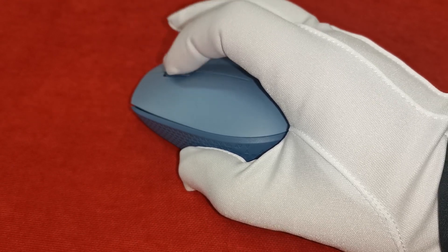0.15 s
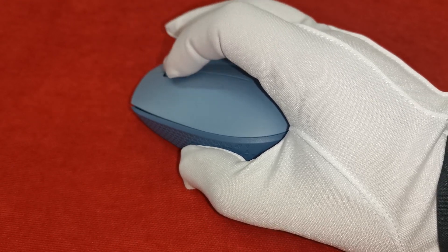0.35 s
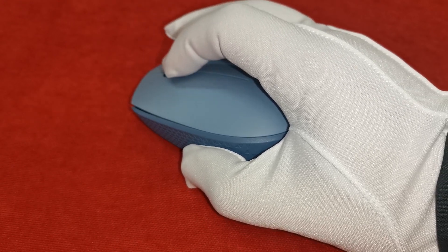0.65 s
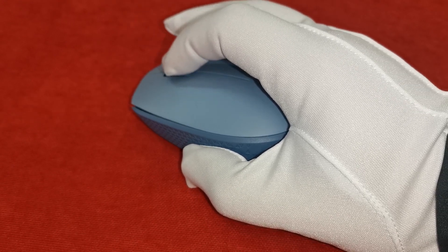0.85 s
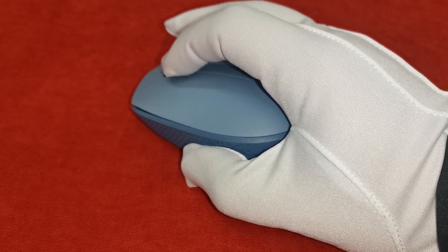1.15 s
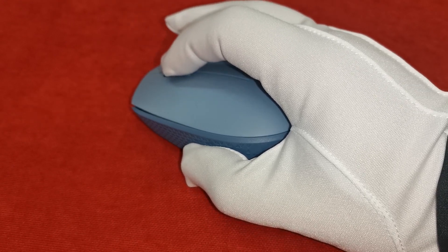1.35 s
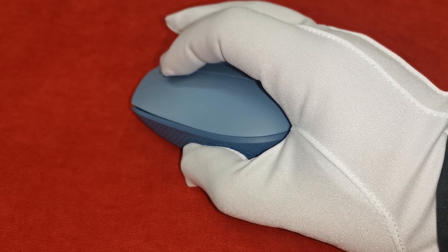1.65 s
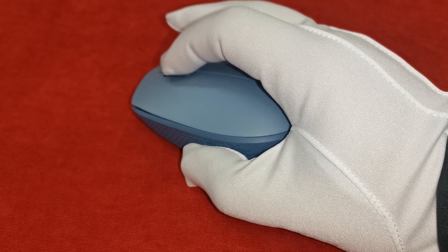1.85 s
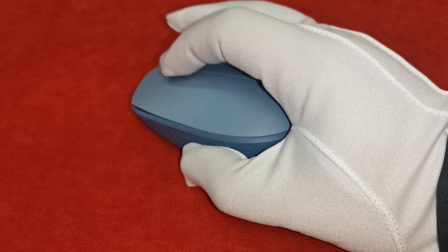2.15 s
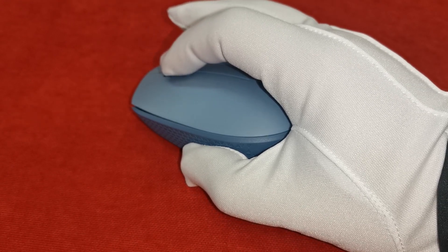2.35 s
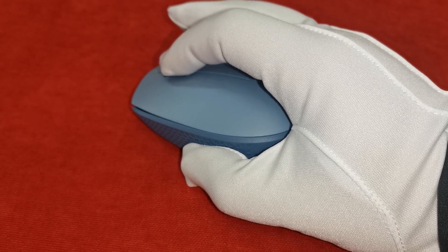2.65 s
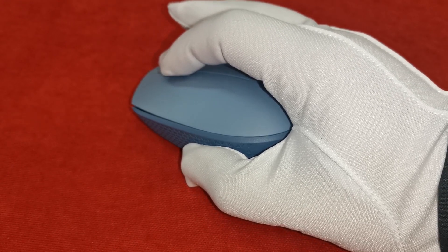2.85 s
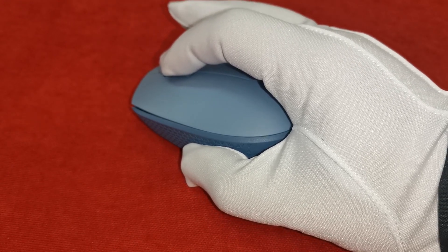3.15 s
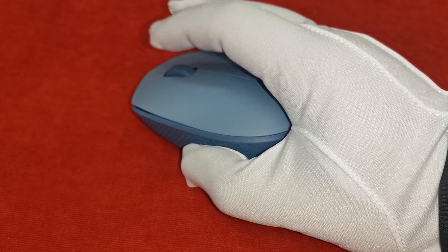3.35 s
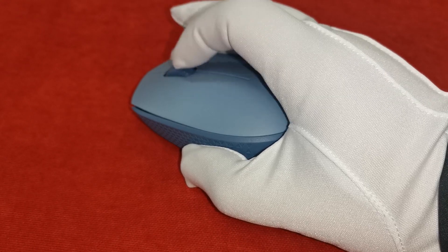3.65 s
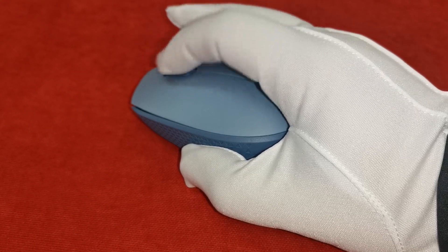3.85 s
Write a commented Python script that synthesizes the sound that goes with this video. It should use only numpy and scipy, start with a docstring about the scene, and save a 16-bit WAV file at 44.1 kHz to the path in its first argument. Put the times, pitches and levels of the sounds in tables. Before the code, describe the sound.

Computer mouse button clicks sixteen times, sharp presses and softer releases, close in a quiet room

```python
"""A quiet room, where a gloved finger clicks a computer mouse button sixteen times close to a stereo
microphone. Each press snaps the switch and rings the plastic shell brightly; each release is a softer, hollower
knock. Both are sums of damped shell modes. At the end the scroll wheel starts to roll, as a train of quick
ticks. Faint rustles sound in narrow noise bands, the room adds echoes and a decaying tail, and shaped noise
gives faint hiss, rumble and hum underneath."""
import sys
import numpy as np
from scipy import signal
from scipy.fft import rfft, irfft
from scipy.io import wavfile

SR = 44100
rng = np.random.default_rng(int(sys.argv[2]) if len(sys.argv) > 2 else 0)


def to_wav(s):
    """Save 16-bit WAV."""
    ch = np.atleast_2d(s).T  # columns
    pcm = np.round(np.clip(ch, -1, 1) * 32767)  # PCM
    wavfile.write(sys.argv[1], SR, pcm.astype(np.int16))


N = 176400  # samples, 4 s


# Presses of the button. Each row: start in seconds, relative level in dB, extra knock near 1 kHz in dB,
# extra clack near 1.6 kHz in dB, extra treble in dB.
PRESSES = [(0.4041, -2.4, 1.5, 1.5, -0.5), (0.835, -2.5, 0, 1.5, -4), (1.0455, 1, 0, -1.5, -4),
           (1.2248, 0.45, 0.5, 0.7, -3), (1.3929, -1.0, 1.3, 0.2, -3.5), (1.5542, -2.3, 4.5, 3, -1),
           (1.7313, -0.5, 3.3, -1.3, -4), (1.895, 0.7, 3.5, -1.5, -4.4), (2.0725, -0.8, 2.8, -1.3, -4.5),
           (2.2431, 0.5, 2.5, 0, -4.3), (2.4119, -1.2, 4.1, 0, -3), (2.5788, 0.4, 3.3, -2.5, -3.9),
           (2.7532, 1.3, 0.7, -2, -3), (2.9281, 0.9, 4.5, 2, -1.5), (3.0988, 0.7, 3.2, 0, -1.8),
           (3.2756, -3, 7, 5.5, 0.5)]
# Contacts within one press. Each row: delay in seconds, relative level in dB.
PRESS_CONTACTS = [(.0001, 1.5), (.00092, -7.5), (.0024, -24.5)]
PRESS_DB, PRESS_JITTER_S = 1.5, .000008


def button_presses():
    """Modal excitation: the snapping switch drives the shell's bright modes, nearly alike each time."""
    pressed_db = np.transpose(SHELL)[2]
    return button(PRESSES, PRESS_CONTACTS, pressed_db + PRESS_DB, PRESS_JITTER_S)


# Releases of the button. Each row: start in seconds, relative level in dB, extra knock near 1 kHz in dB,
# extra clack near 1.6 kHz in dB, extra treble in dB.
RELEASES = [(0.4788, -2.5, 0.4, -3, -1), (0.9595, 2.3, -16, -11, -5), (1.1387, 4, -5, -3.3, -6),
            (1.3004, 4.5, -12, -7, -6.5), (1.4745, -1.3, 0.6, 2, -0.5), (1.6621, -1.3, 0.2, -11, -4.5),
            (1.8128, -7, 5, 9, -0.5), (1.9915, 1.6, -1, -1, -2.3), (2.1579, 1, -3.1, -2.4, -6),
            (2.3248, -3.5, 3.5, 2, -0.5), (2.5102, 0, -0.3, -2.4, -3.5), (2.686, -1.2, -1, -3, -0.5),
            (2.8456, -1.5, 1.3, 0.9, -3.5), (3.0253, -0.5, 1.5, 3, -2), (3.1828, -2.5, 1.5, 0.5, 0.1),
            (3.3661, -3.6, 2.1, 8, 0.2)]
# Contacts within one release. Each row: delay in seconds, relative level in dB.
RELEASE_CONTACTS = [(.0002, 2), (.0021, -8.5)]
RELEASE_DB, RELEASE_JITTER_S = 2, .00007


def button_releases():
    """Modal excitation: the release favours the low modes, and its contacts are more loosely timed."""
    released_db = np.transpose(SHELL)[3]
    return button(RELEASES, RELEASE_CONTACTS, released_db + RELEASE_DB, RELEASE_JITTER_S)


def button(strokes, contacts, drive_db, jitter_s):
    """Repeated impact: each stroke snaps the switch over, and it strikes again a moment later."""
    out = np.zeros((3, N))
    for start_s, db, knock, clack, treble in strokes:
        for delay, contact_db in contacts:
            late_s = abs(delay + jitter_s * rng.standard_normal())
            colour_db = [knock, clack, 0, treble]
            add(out, start_s, ring(drive_db + db + contact_db, colour_db, late_s))
    return out


# Modes of the plastic shell. Each row: frequency in Hz, 60 dB decay time in seconds,
# relative level when pressed in dB, relative level when released in dB, left minus right in dB.
SHELL = [(629, 0.034, -51, -54.5, -0.5), (821.5, .022, -42, -38, 3), (1117, 0.012, -38.5, -34.5, -3),
         (1326, 0.011, -35, -50.5, -2.5), (1724, 0.01, -27.5, -45.5, 2.5), (2042, 0.03, -36.5, -52, 2),
         (2415, 0.014, -27, -42, 2.5), (2760, 0.0099, -24, -42, 1), (3158, 0.0085, -28.5, -42.5, -2),
         (3680, .012, -31.5, -50, -6), (4270, 0.013, -34.5, -52, -9.5), (5240, 0.0046, -39, -49.5, -9),
         (6600, 0.014, -48.5, -61, -15), (12430, 0.0065, -56, -65, -20)]
# Centres of the knock, clack, middle and treble colouring, in Hz.
COLOUR_HZ = [1100, 1500, 2500, 3600]
MODE_SCATTER_DB = 1.48
RIGHT_LAG_S = .000085  # the sound reaches the left port first


def ring(drive_db, colour_db, delay_s, size=2400):
    """Modal superposition: one contact sums damped sines, heard at the left port, right port and in the room."""
    hz, t60, _, _, side_db = np.transpose(SHELL)
    coloured_db = drive_db + np.interp(np.log(hz), np.log(COLOUR_HZ), colour_db)
    mode_db = coloured_db + MODE_SCATTER_DB * rng.standard_normal(len(hz))
    sign = (-1) ** np.arange(len(hz))  # neighbouring modes swing in opposite directions
    paths = []
    for lag_s, side in ((0, .5), (RIGHT_LAG_S, -.5), (0, 0)):
        t = np.maximum(np.arange(size) / SR - delay_s - lag_s, 0)[:, None]
        envelope = amp(mode_db + side * side_db - 60 * t / t60)
        modes = sign * envelope * np.sin(2 * np.pi * hz * t)
        paths.append(modes.sum(1))
    return np.array(paths)


WHEEL_START_S, WHEEL_TICKS_PER_S = 3.964, 330
WHEEL_DB, WHEEL_SCATTER_DB = -11, 1.5
# Colouring of the wheel's ticks: knock, clack, middle and treble, in dB.
WHEEL_COLOUR_DB = [4, 2, 2.5, 3.5]


def wheel():
    """Impact train: the rolling wheel rattles the shell's release modes with quick uneven ticks."""
    released_db = np.transpose(SHELL)[3]
    out = np.zeros((3, N))
    for start_s in np.arange(WHEEL_START_S, N / SR, 1 / WHEEL_TICKS_PER_S):
        db = WHEEL_DB + WHEEL_SCATTER_DB * rng.standard_normal()
        late_s = .5 * rng.random() / WHEEL_TICKS_PER_S  # up to half an interval
        add(out, start_s, ring(released_db + db, WHEEL_COLOUR_DB, late_s))
    return out


# Tone of the clicks as picked up by the microphone. Each row: frequency in Hz, gain in dB.
MICROPHONE_TONE = [(100, -17), (450, -2), (750, -2.5), (6800, -1.5), (7600, -4), (8800, -10.5), (9500, -1),
                   (14000, -6.5)]


def microphone_colour(x, size=2048):
    """Microphone colouring: the clicks are heard with thinned bass and a dip near 8.8 kHz."""
    log_gain = np.log(amp(read(MICROPHONE_TONE, abs(np.fft.fftfreq(size, 1 / SR)))))
    # The Hilbert transform of the log gain gives the phase of a causal, minimum-phase filter.
    response = np.exp(signal.hilbert(log_gain).conj())
    taps = np.fft.ifft(response).real
    return signal.oaconvolve(x, taps[None], axes=1)[:, :N]


# Faint rustles in narrow noise bands: one fades away as the scene opens, and later the glove brushes the shell.
# Each row: centre in seconds, spread in seconds, # frequency in Hz, width in Hz, level in dB.
RUSTLES = [(.005, 0.017, 3100, 200, -65.5), (.005, 0.021, 6300, 600, -74.5), (3.705, 0.031, 1150, 140, -70)]
RASP_HZ, RASP_WIDTH_HZ, RASP_DB = 6560, 350, -70.5


def glove():
    """Friction noise: a faint rustle fades as the scene opens, the glove brushes the shell once, and it rasps
    on the turning wheel."""
    t = np.arange(N) / SR
    rustles = np.zeros(N)
    for centre_s, spread_s, hz, width_hz, db in RUSTLES:
        swell = np.exp(-.5 * ((t - centre_s) / spread_s) ** 2)
        rustles += amp(db) * swell * band_noise(hz, width_hz)
    rasp = amp(RASP_DB) * (t > WHEEL_START_S) * band_noise(RASP_HZ, RASP_WIDTH_HZ)
    return rustles + rasp


# Diffuse tail of the room. Each row: frequency in Hz, 60 dB decay time in seconds, tail level in dB.
ROOM = [(300, .5, 3.5), (624, 0.41, 0), (1000, 0.22, -8.5), (1730, 0.25, -6), (2240, 0.33, -8.5),
        (2760, 0.43, -13), (3900, 0.25, -8), (7000, 0.2, -11.5), (13000, 0.094, -8)]
ROOM_DELAY_S = .003
# Standing waves of the room. Each row: frequency in Hz, 60 dB decay time in seconds, level in dB.
ROOM_MODES = [(486.8, 1, -54.5), (606, 0.29, -50.5), (866, 0.29, -70.5)]
# Echoes from nearby surfaces. Each row: delay in seconds, left level in dB, right level in dB.
ECHOES = [(.0033, -23, -25), (0.0086, -44, -13.5)]


def room(x, size=24000):
    """Reverberation: close echoes, standing waves and a diffuse tail whose decay depends on frequency."""
    hz, t, z = signal.stft(rng.standard_normal((2, size)), SR, nperseg=256)
    z = z / (abs(z) + 1e-12) * z.std()  # an even, uncoloured wash
    rate = np.log(1000) / read(ROOM, hz)[:, None]
    decay = np.exp(-rate * t)
    equal_energy = np.sqrt(2 * rate / SR)  # offsets the decay time's effect on energy
    z = z * decay * equal_energy * amp(read(ROOM, hz, axis=2))[:, None]
    tail = signal.istft(z, SR, nperseg=256)[1]
    age = np.arange(tail.shape[1]) / SR
    for mode_hz, t60, db in ROOM_MODES:
        tail = tail + amp(db - 60 * age / t60) * np.sin(2 * np.pi * mode_hz * age)
    out = np.zeros((2, N))
    add(out, ROOM_DELAY_S, signal.fftconvolve(x, tail, axes=1))
    for delay, left_db, right_db in ECHOES:
        add(out, delay, x * amp([[left_db], [right_db]]))
    return out


# Spectrum of the hiss. Each row: frequency in Hz, relative density in dB per Hz.
HISS = [(300, -8), (600, -2), (900, 0), (1400, -5.5), (3000, -9), (4800, -12), (6800, -20), (7700, -26),
        (8800, -29), (10500, -23.5), (12600, -21), (14400, -50)]
HISS_DB = -69
# Spectrum of the low room noise. Each row: frequency in Hz, relative density in dB per Hz.
RUMBLE = [(12, -31), (20, 3.5), (27, -8), (70, -6), (114, -7.5), (192, -4.5), (282, -9), (340, -12),
          (370, -11), (600, -24.5), (780, -30), (1320, -120)]
# Level of the low room noise. Each row: time in seconds, level in dB.
RUMBLE_DB = [(0.0, -64.5), (.2, -63), (.4, -63.5), (.75, -63), (1.5, -65), (3.2, -64), (3.9, -66)]
# Bands of the hum. Each row: frequency in Hz, width in Hz, level in dB.
HUM = [(44.5, 8.3, -83.5), (157, 7.6, -75.5), (206.5, 13, -75.5)]


def background():
    """Stationary and modulated noise: steady hiss, a slowly swelling rumble and a low, wavering hum."""
    rumble_db = np.interp(np.arange(N) / SR, *np.transpose(RUMBLE_DB))
    rumble = amp(rumble_db) * stereo_noise(RUMBLE)
    hum = sum(amp(db) * band_noise(hz, width_hz / 2) for hz, width_hz, db in HUM)
    hiss = amp(HISS_DB) * stereo_noise(HISS)
    return hiss + rumble + hum


# Likeness of the noise at the two ports. Each row: frequency in Hz, correlation from 0 to 1.
NOISE_LIKENESS = [(30, .45), (150, 0.38), (400, 0.45), (1000, 0.12), (3000, 0.045), (12000, 0.015)]
# Balance of the noise. Each row: frequency in Hz, left minus right in dB.
NOISE_BALANCE = [(40, 0), (180, -3.5), (1000, -2), (4000, -2), (12000, -6.5)]


def stereo_noise(spectrum):
    """Spatial coherence: noise of rms 1, partly alike at both ports in the bass, barely in the treble."""
    hz = np.fft.rfftfreq(N, 1 / SR)
    a, b = rfft(rng.standard_normal((2, N)))
    same = np.clip(read(NOISE_LIKENESS, hz), -1, 1)
    z = np.array([a, same * a + np.sqrt(1 - same ** 2) * b])
    side_db = np.array([[.5], [-.5]]) * read(NOISE_BALANCE, hz)
    return unit(irfft(z * amp(read(spectrum, hz) + side_db), N))


def band_noise(hz, width_hz):
    """Spectral shaping: a bell-shaped window leaves one band of noise, at rms 1."""
    f = np.fft.rfftfreq(N, 1 / SR)
    bell = np.exp(-.5 * ((f - hz) / width_hz) ** 2)
    return unit(irfft(rfft(rng.standard_normal(N)) * bell, N))


def amp(db):
    """Logarithmic level: decibels to amplitude gain."""
    return 10 ** (np.asarray(db) / 20)


def unit(x):
    """Normalization: scales to rms 1."""
    return x / np.sqrt(np.mean(x ** 2) + 1e-20)


def read(points, hz, axis=1):
    """Interpolation: reads one column of a table along log frequency."""
    columns = np.transpose(points)
    return np.interp(np.log(hz + 1), np.log(columns[0] + 1), columns[axis])


def add(mix, start_s, sound):
    """Superposition: mixes a sound in, in place, from a start in seconds."""
    part = mix[:, max(round(start_s * SR), 0):][:, :sound.shape[1]]
    part += sound[:, :part.shape[1]]


def scene():
    """Superposition: direct sound of the mouse, its room response, the glove and the background."""
    mouse = microphone_colour(button_presses() + button_releases() + wheel())
    direct, into_room = mouse[:2], mouse[2:]
    return direct + room(into_room) + glove() + background()


CUT_HZ = 14600


def record(dry):
    """Band limiting: a linear-phase low-pass filter removes the highest treble."""
    taps = signal.firwin(255, CUT_HZ, window=("kaiser", 8), fs=SR)
    return signal.oaconvolve(dry, taps[None], "same", axes=1)


dry = scene()
out = record(dry)
to_wav(out)
```